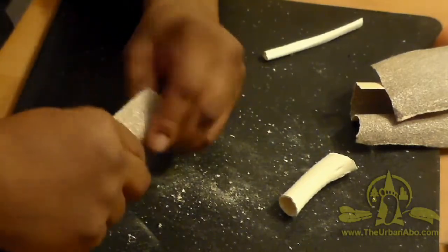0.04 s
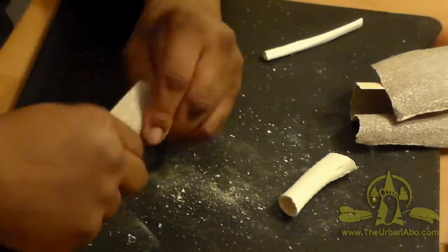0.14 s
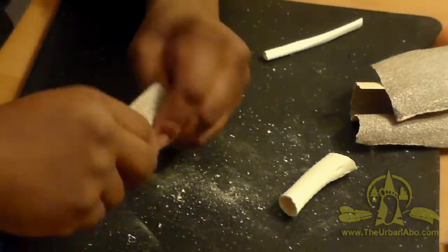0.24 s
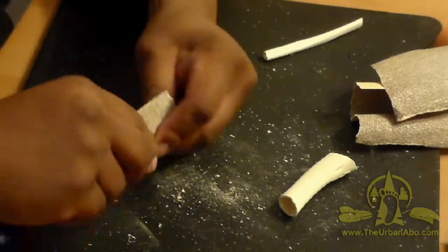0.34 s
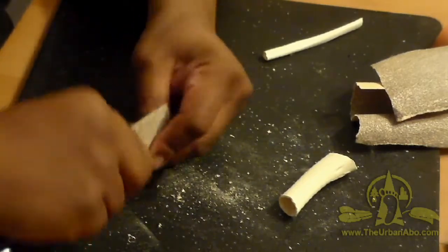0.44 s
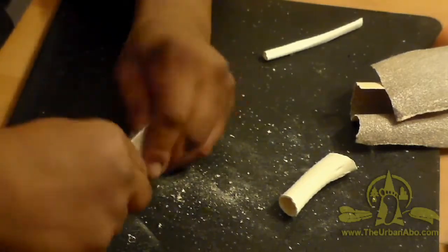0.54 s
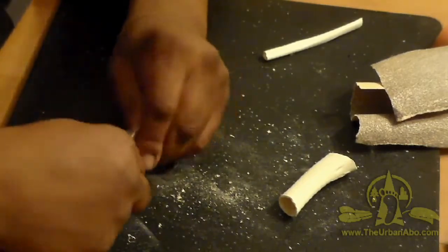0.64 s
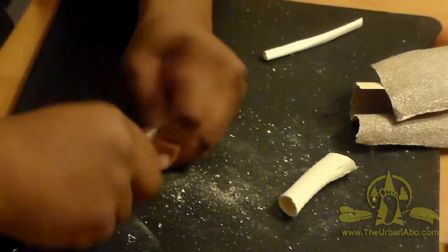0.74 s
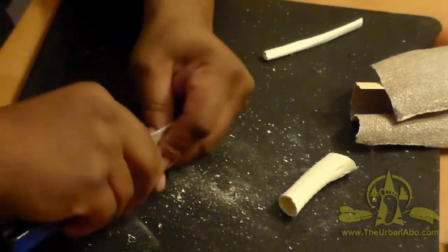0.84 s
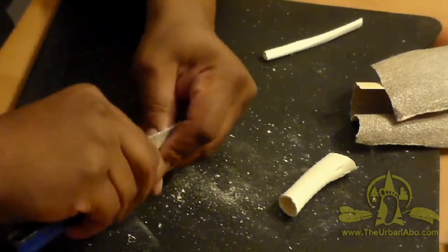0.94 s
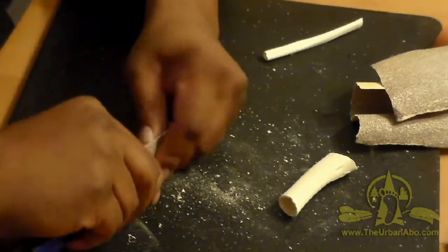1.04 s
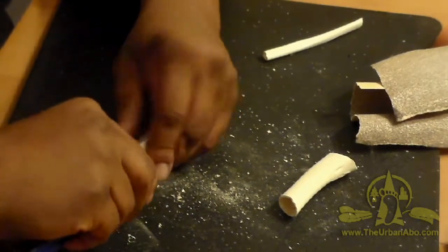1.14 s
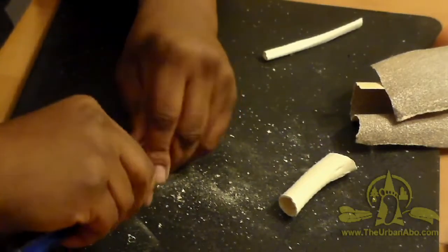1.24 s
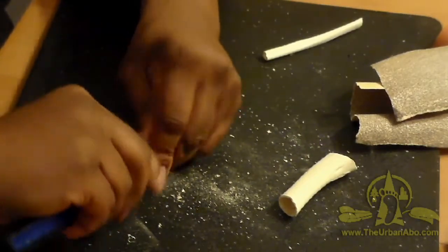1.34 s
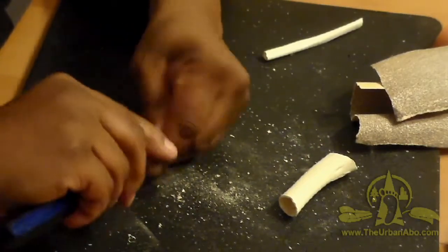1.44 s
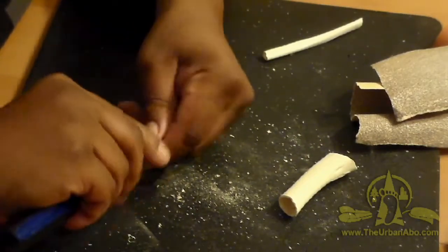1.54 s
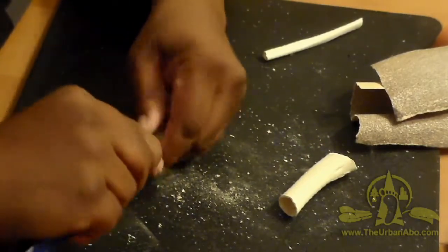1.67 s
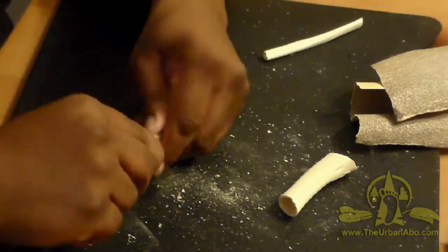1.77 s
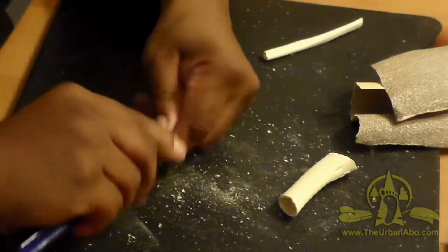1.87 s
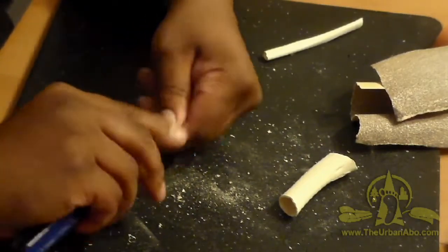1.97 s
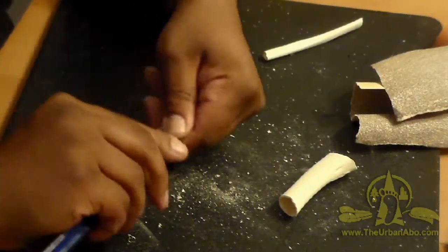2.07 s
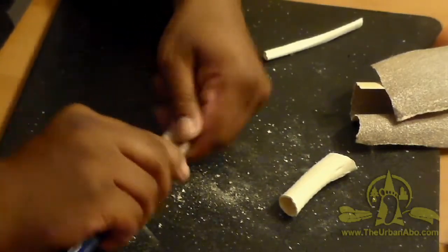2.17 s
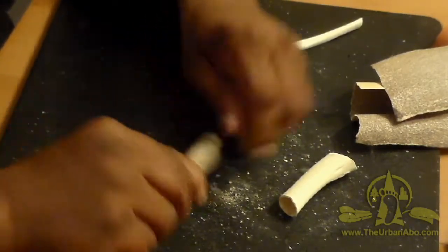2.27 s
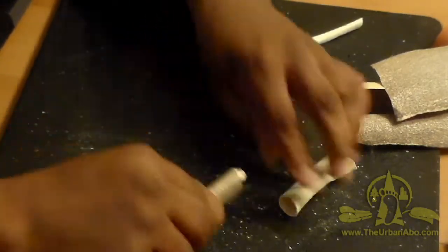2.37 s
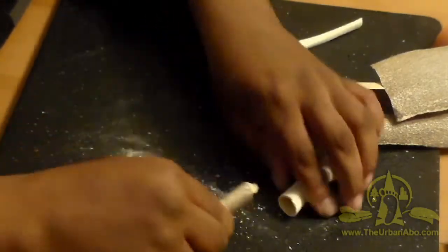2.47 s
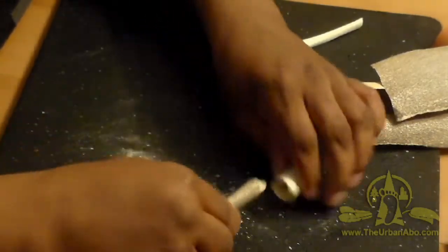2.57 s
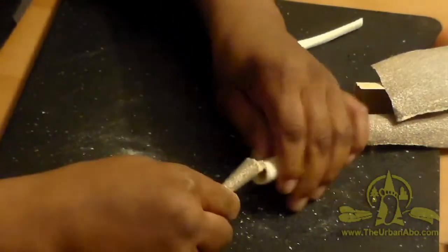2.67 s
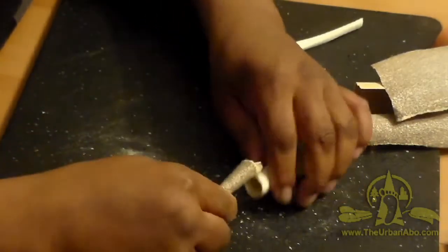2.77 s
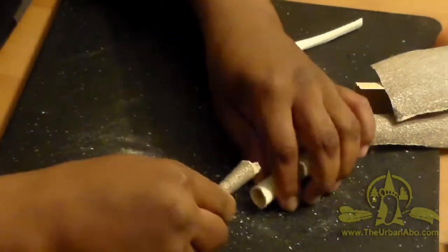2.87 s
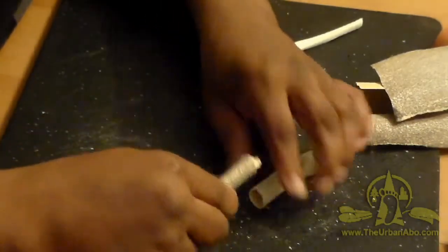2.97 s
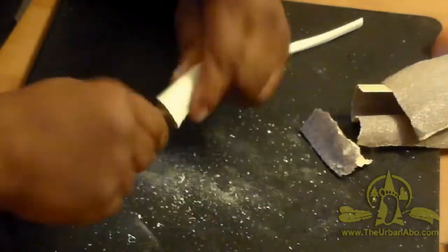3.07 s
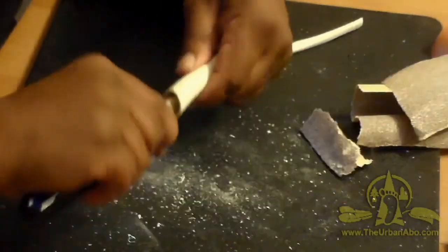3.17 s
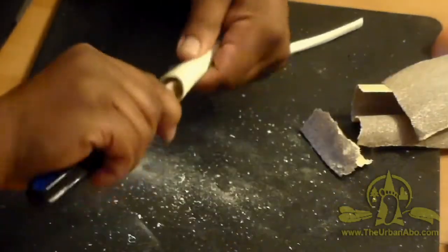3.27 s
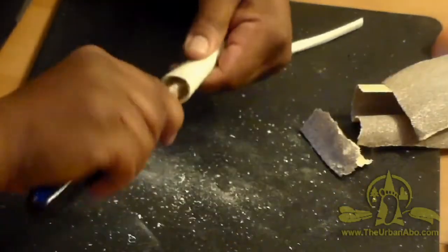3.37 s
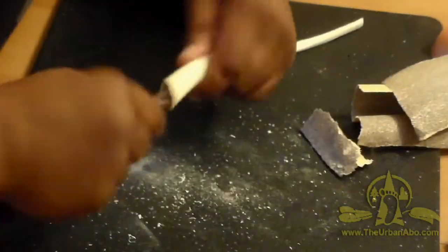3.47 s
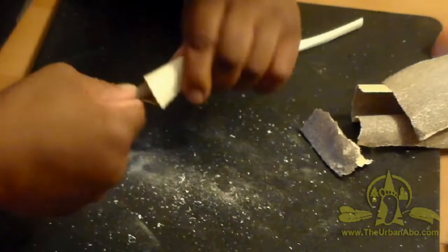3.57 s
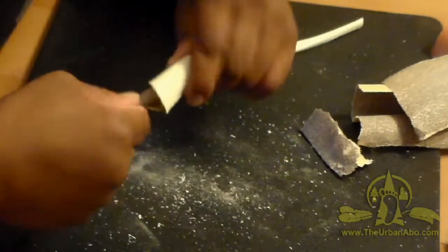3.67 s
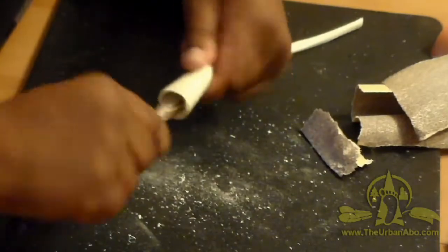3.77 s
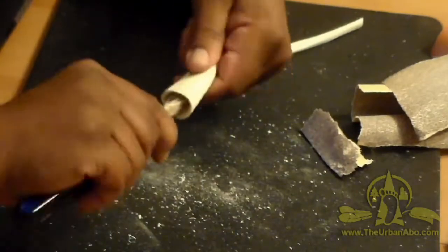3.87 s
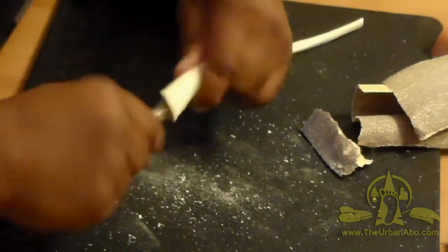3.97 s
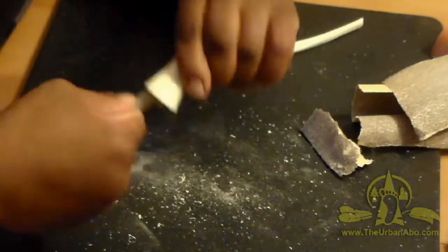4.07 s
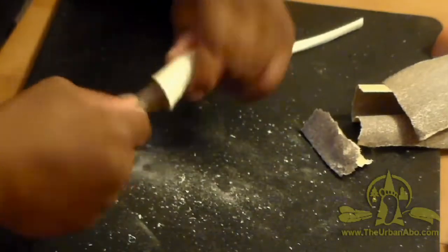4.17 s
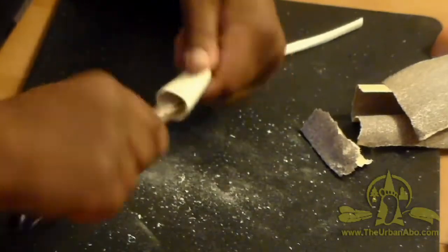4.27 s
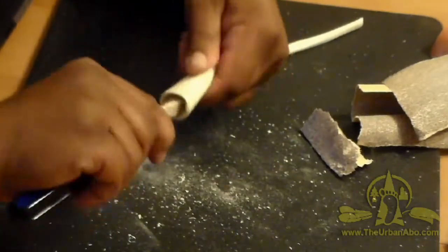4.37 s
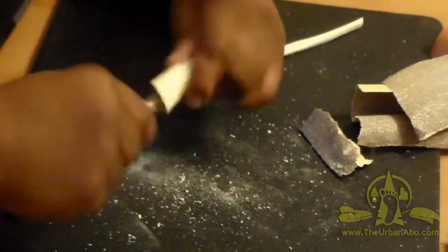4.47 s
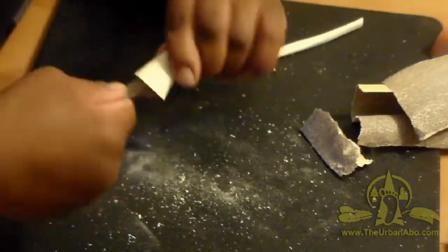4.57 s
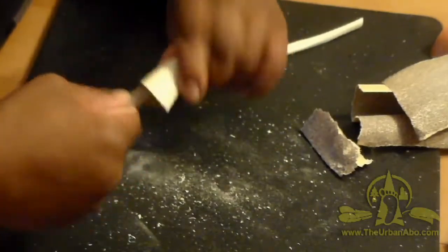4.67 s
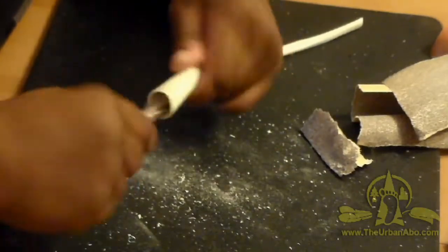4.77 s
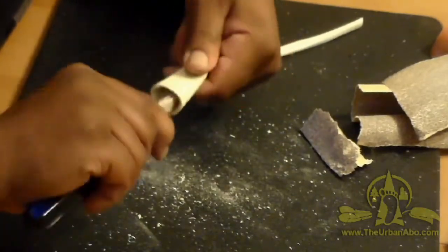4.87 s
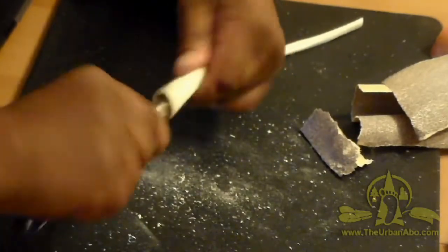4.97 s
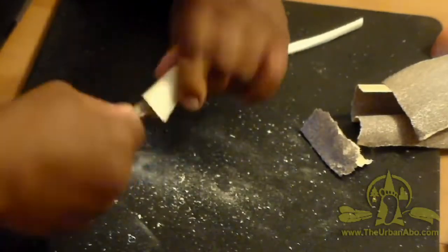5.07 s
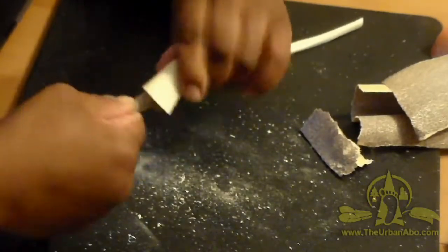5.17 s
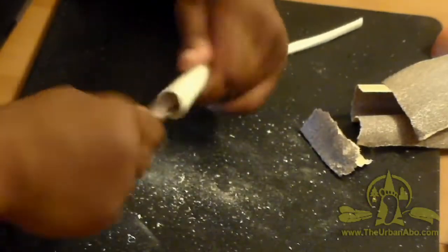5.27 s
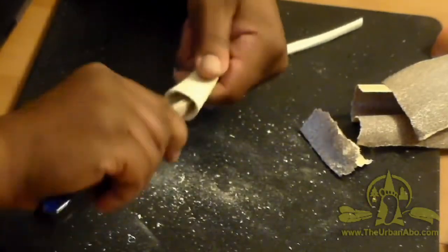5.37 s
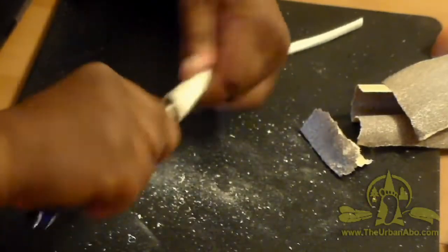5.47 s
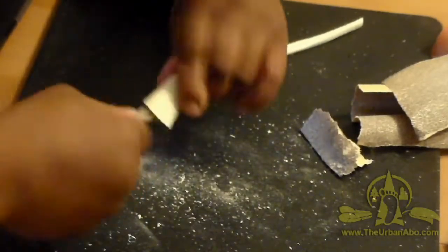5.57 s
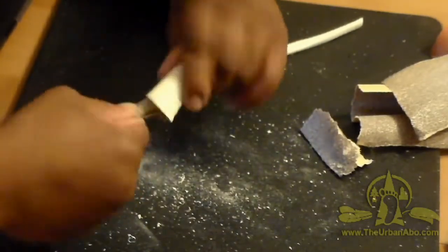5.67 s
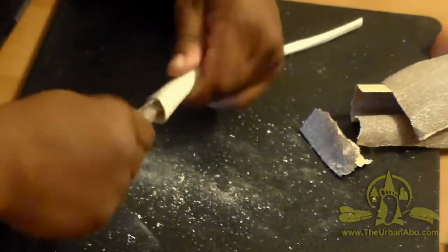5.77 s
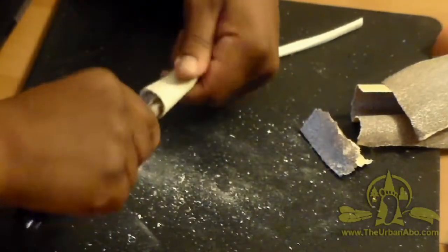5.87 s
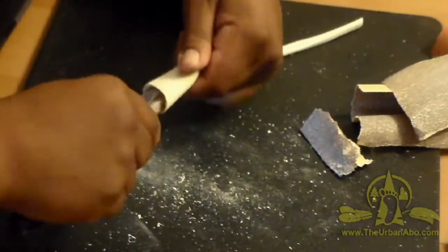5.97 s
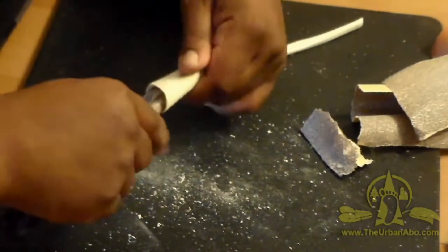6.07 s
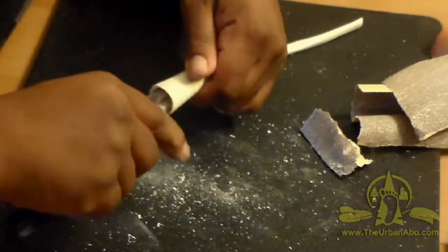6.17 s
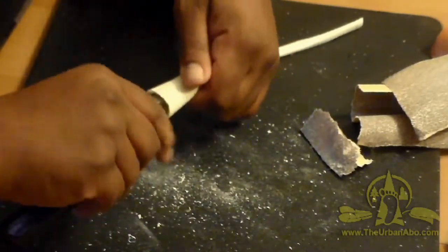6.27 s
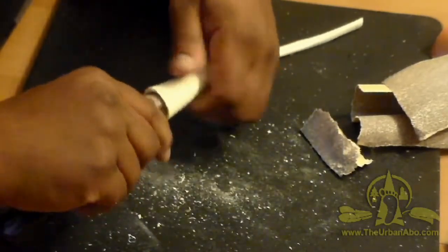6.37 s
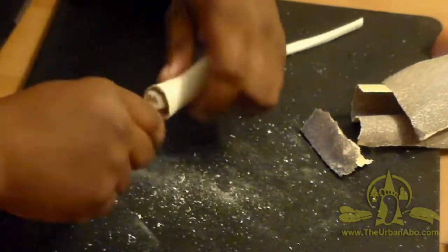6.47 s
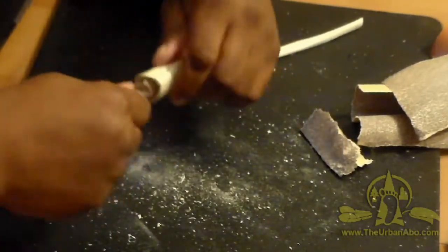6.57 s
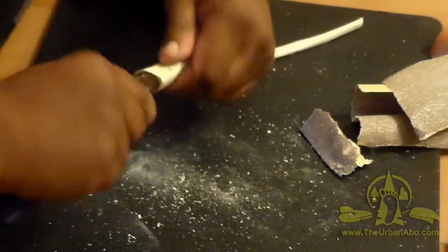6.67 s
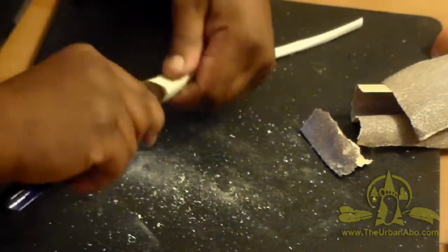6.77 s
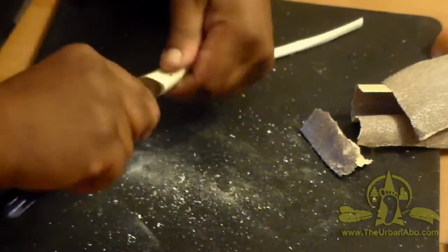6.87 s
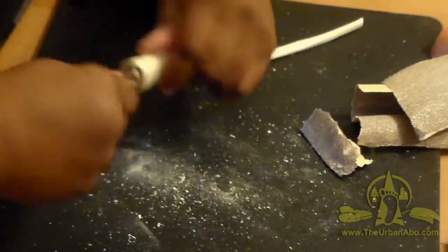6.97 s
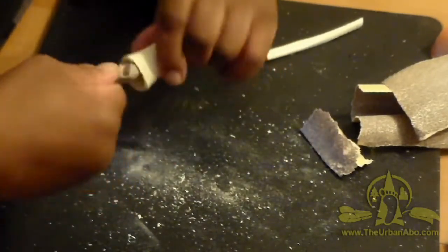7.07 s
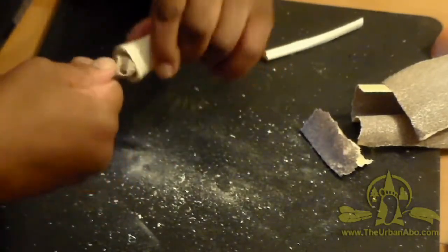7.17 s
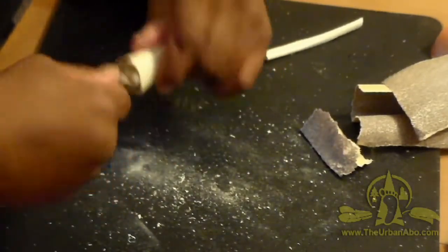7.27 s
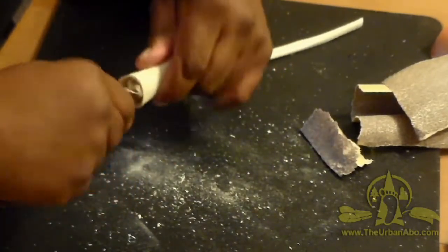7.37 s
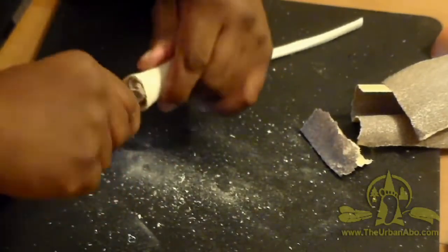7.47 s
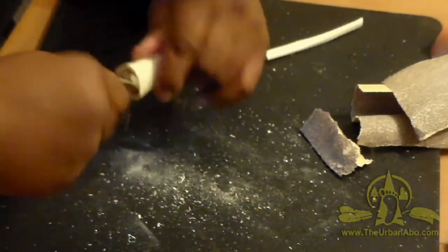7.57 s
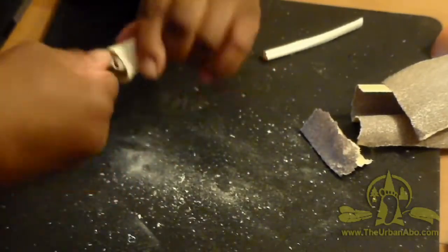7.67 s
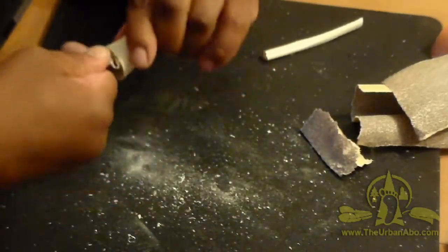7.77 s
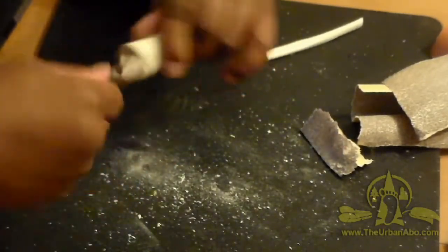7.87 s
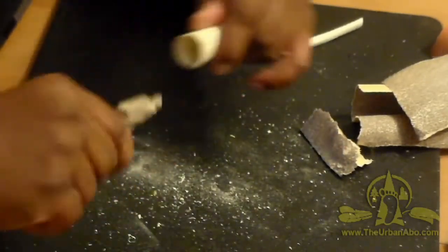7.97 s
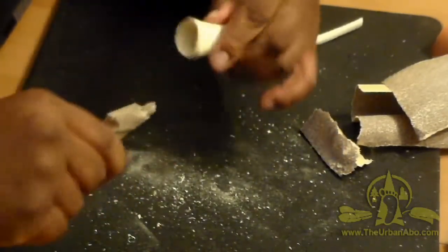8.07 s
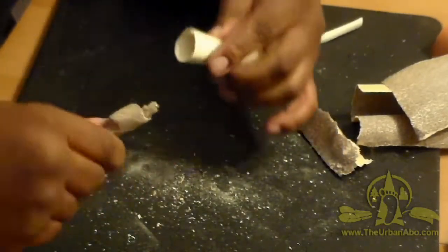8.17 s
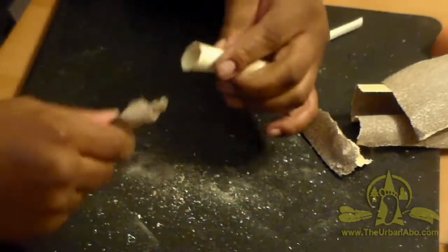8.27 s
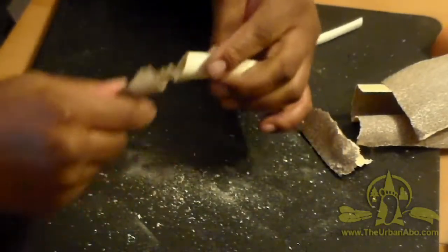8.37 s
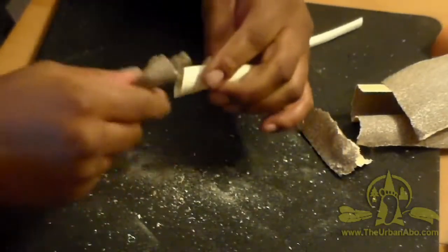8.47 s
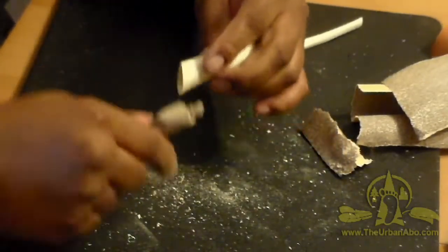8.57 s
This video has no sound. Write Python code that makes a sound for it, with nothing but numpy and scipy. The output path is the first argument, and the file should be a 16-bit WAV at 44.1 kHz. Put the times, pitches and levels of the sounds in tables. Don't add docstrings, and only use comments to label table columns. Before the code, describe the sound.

A close stereo pickup in a small reflective room, with quiet air hiss and a faint unsteady low motor hum throughout. From 0 to 2.4 s coarse sandpaper is rolled in short uneven turns: dry rasps, papery crackles and sharp grit catches, strongest in the first 0.3 s and around 1.1 to 1.3 s and 1.85 s. At 2.6 to 3.0 s a hollow bone scuffs over the mat, knocks the table several times, hardest near 2.8 s, its tube singing narrowly. Near 3.07 s there is a tiny silent gap. From 3.2 to 6.1 s much louder, quick gritty twists scrape inside the bone, about four a second, catches ringing hollow and bright, with faint low handle creaks near 3.5 and 6 s. A lull follows with faint turns, then sharp snags at 6.75 to 6.9 s and separate twists near 7.1, 7.4 and 7.8 s, ending on a bright jerk at 8.0 s and quiet room.

```python
import sys
import numpy as np
from scipy import signal
from scipy.fft import rfft, irfft, next_fast_len
from scipy.io import wavfile
from scipy.ndimage import map_coordinates

SR = 44100
rng = np.random.default_rng(int(sys.argv[2]) if len(sys.argv) > 2 else 0)


def unload_audio(sound):
    columns = np.transpose(np.atleast_2d(sound))
    steps = np.round(np.clip(columns, -1, 1) * 32767)
    wavfile.write(sys.argv[1], SR, steps.astype(np.int16))


def voltage_ratio(level):
    return 10 ** (np.asarray(level, float) / 20)


N = 381024


def along(points, hz):
    f, v = np.transpose(points)
    return np.interp(np.log(hz + 1), np.log(f + 1), v)


def wobble(knots_per_s):
    knots = rng.standard_normal(int(N * knots_per_s / SR) + 4)
    return map_coordinates(knots, [np.arange(N) * knots_per_s / SR])


def filtered(x, response):
    m = next_fast_len(x.shape[-1] + 1024)
    spectrum = rfft(x, m) * response(np.fft.rfftfreq(m, 1 / SR))
    return irfft(spectrum, m)[..., :x.shape[-1]]


def pair(noise, alike, colour):
    def weights(hz):
        turn = np.arccos(np.clip(along(alike, hz), -1, 1)) / 2
        return colour(hz) * np.array([np.cos(turn), np.sin(turn)])

    mid, side = filtered(noise, weights)
    return np.array([mid + side, mid - side])


def dying(t60):
    return voltage_ratio(-60 * np.arange(SR // 5) / SR / t60)


def blows(rows, shape):
    force = np.zeros((len(rows[0]) - 1, N))
    for s, db, *over in rows:
        force[:, round(s * SR)] = voltage_ratio(db + np.array([0, *over]))
    return signal.oaconvolve(force, shape[None], axes=1)[:, :N]


def stroked(rows, follows=0):
    attack_db_per_s, release_db_per_s = 2500, 411
    arch_db = 4
    t = np.arange(0, N, 32) / SR
    s, length, db, colour, swell = np.transpose(rows)[..., None]
    along_stroke = np.clip((t - s) / length, 0, 1) - .5
    shape = swell * along_stroke - arch_db * (2 * along_stroke) ** 2
    shape -= attack_db_per_s * np.maximum(s - t, 0)
    shape -= release_db_per_s * np.maximum(t - s - length, 0)
    gain = np.linalg.norm(voltage_ratio(db + follows * colour + shape), axis=0)
    return np.interp(np.arange(N) / SR, t, gain)


def grit(rate, spread_db, clump_db, smooth):
    grain_sizes = voltage_ratio(spread_db * np.minimum(rng.exponential(1, N), 2.5))
    releases = (rng.random(N) < rate / SR) * grain_sizes
    releases = np.abs(signal.oaconvolve(releases, dying(t60=0.0043))[:N])
    size = np.hypot(releases / releases.std(), smooth) * voltage_ratio(clump_db * wobble(40))
    return size / np.sqrt(np.mean(size ** 2))


def ringing(level, catches, grains, modes, roam_db):
    busy = np.flatnonzero(level > voltage_ratio(-120))
    span = slice(busy[0], min(busy[-1] + 4096, N))
    count = span.stop - span.start
    total = np.sqrt(sum(voltage_ratio(db) ** 2 * w for hz, w, db in modes))
    out = np.zeros(N)
    for hz, w, db in modes:
        knots = rng.standard_normal(N // 1000 + 2)
        roam = voltage_ratio(roam_db * np.interp(np.arange(count) / 1000, np.arange(len(knots)), knots))
        force = roam * np.hypot(level * grains, catches)[span] * rng.standard_normal(count)
        out[span] += voltage_ratio(db) * signal.lfilter(*signal.iirpeak(hz, hz / w, SR), force)
    small = signal.butter(2, 0.86 * modes[0][0], "high", fs=SR)
    return signal.lfilter(*small, out) * np.sqrt(SR / np.pi) / total


# (frequency [Hz], density [dB per Hz])
AIR_SPECTRUM = [(8.8, -52), (15, 0.5), (57, -7.5), (248, -20), (787, -26.5), (10000, -33), (13800, -33.5),
                (15000, -48.5)]
# (frequency [Hz], likeness [0..1])
AIR_LIKENESS = [(30, 0.813), (130, 0.7), (300, 0.44), (700, 0.23), (5000, 0.062)]


def background():
    shaft_hz, shaft_db, second_db, air_db = 29.9, -55, -62.5, -54.5
    turns = 2 * np.pi * np.cumsum(shaft_hz * (1 + 0.011 * wobble(2.915))) / SR
    hum = voltage_ratio(shaft_db + 4.0 * wobble(2.98)) * np.sin(turns)
    second_level = voltage_ratio(second_db + 4.4 * np.tanh(wobble(7)))
    hum += second_level * np.sin(2 * turns + 0.62 * wobble(19))
    air = pair(rng.standard_normal((2, N)), AIR_LIKENESS, lambda hz: voltage_ratio(along(AIR_SPECTRUM, hz)))
    return hum + voltage_ratio(air_db) * air / air.std()


# (frequency [Hz], width [Hz], level [dB])
FIZZ_MODES = [(9130, 2900, 7), (10300, 900, -12), (11900, 3100, 0.5)]
# (frequency [Hz], width [Hz], level [dB])
HAND_MODES = [(406, 285, -3.5), (583, 190, -3.5), (1126, 600, -3.5)]


def rasp(strokes, catches, body, slip_db, fizz_db):
    stroke_db, catch_db, grip_db = -4, -7.5, -17
    shares = (0, 1, .5, -.6)
    low, high, fizz, grip = (voltage_ratio(stroke_db) * stroked(strokes, share) for share in shares)
    catch_and_slip = dying(t60=0.01) + voltage_ratio(slip_db) * dying(t60=0.22)
    jolt, bright_jolt = voltage_ratio(catch_db) * np.abs(blows(catches, catch_and_slip))
    grains = grit(rate=400, spread_db=0.5, clump_db=1.5, smooth=0.75)
    sound = ringing(low, jolt, grains, body[0], roam_db=2)
    sound += ringing(high, voltage_ratio(0.5) * bright_jolt, grains, body[1], roam_db=2)
    sound += ringing(voltage_ratio(fizz_db) * fizz, voltage_ratio(fizz_db + 3.5) * bright_jolt, grains, FIZZ_MODES, roam_db=1)
    return sound + ringing(voltage_ratio(grip_db) * grip, voltage_ratio(-19.5) * jolt, grains, HAND_MODES, roam_db=0.5)


# (start [s], length [s], level [dB], brightness [dB], swell [dB])
ROLLING_STROKES = [(-.06, 0.29, -46.5, -5, -9), (.235, 0.1, -45, 4, 3), (.475, 0.28, -55, 0, -12),
                   (.8, 0.56, -55, 2.5, 5), (1.06, 0.1, -49, 8.5, -13.5), (1.15, .11, -41.5, -0.5, -12.5),
                   (1.3, 0.29, -49.5, 1, -3.5), (1.69, 0.15, -45.5, 1.5, -15.5),
                   (1.85, 0.028, -40.5, -9, -8), (1.89, 0.09, -57.5, -0.5, 0),
                   (2.0, 0.18, -55.5, -11.5, -23), (2.245, 0.083, -55, 4.5, -5),
                   (2.32, 0.056, -40.5, -10, -1)]
# (time [s], peak [dB], brightness [dB])
PAPER_CRACKLES = [(0.055, -37, -12), (0.131, -28, -6), (0.2092, -28, -13), (0.2403, -20, 5),
                  (0.2896, -25, 3), (0.4791, -42, 2), (0.4988, -39.5, 6.5), (0.5545, -33.5, -10),
                  (0.5911, -36.5, -12), (0.8018, -37, 8.5), (0.858, -34, -11), (0.8975, -27.5, -5),
                  (0.9786, -49, 10), (1.067, -22.5, -9.5), (1.1023, -29.5, -2), (1.1667, -19, -12),
                  (1.244, -38, 9), (1.3216, -20.5, -8.5), (1.3979, -35, 9.5), (1.4217, -34.5, 8),
                  (1.5862, -36, -3.5), (1.695, -27.5, 0), (1.8452, -21.5, -6), (1.8919, -34, -8),
                  (2.0083, -44, 5), (2.1976, -41, -0.5), (2.2518, -27.5, -2), (2.2912, -37, 3),
                  (2.347, -29, -3)]
# (frequency [Hz], width [Hz], level [dB])
PAPER_MODES = [
    [(1716, 870, -6.5), (2330, 480, 2), (2550, 170, -6), (2850, 430, -14)],
    [(3450, 300, 1), (4150, 320, 0.5), (5160, 1000, -2), (6740, 940, 1)],
]


def rolling():
    return rasp(ROLLING_STROKES, PAPER_CRACKLES, PAPER_MODES, slip_db=-20.5, fizz_db=-3)


# (delay [s], level [dB])
STRONGEST_ECHO = (.0053, -5)
# (delay [s], level [dB])
WALL_ECHOES = [(.0027, -21.5), (.0061, -9), (.015, -12), (.026, -16.5)]
# (frequency [Hz], likeness [0..1])
ROOM_LIKENESS = [(300, 0.92), (1500, .95), (3000, 0.85), (6000, 0.072), (14000, 0.029)]


def close_paths(lag):
    smear = np.exp(-np.arange(24) / 5)
    paths = np.zeros((2, 2048))
    for s, db in [STRONGEST_ECHO, *WALL_ECHOES]:
        echo = rng.standard_normal((2, 24)) * smear
        start = round(s * SR + rng.normal(0, 6))
        paths[:, start:start + 24] += voltage_ratio(db) * echo / np.linalg.norm(echo[0])
    paths = pair(paths, ROOM_LIKENESS, np.ones_like)
    ports = np.array([[-.5], [.5]]) * lag * rng.standard_normal()
    port_gain = voltage_ratio(np.array([[-.4], [.4]]))
    paths[:, :17] += np.sinc(np.arange(17) - 8 - ports) * np.hanning(17) * port_gain
    return paths


# (frequency [Hz], t60 [s])
ROOM_T60 = [(200, 0.11), (2000, 0.34), (6000, 0.37), (14000, 0.38)]


def room(x, tail_db, lag):
    hz, t, z = signal.stft(rng.standard_normal((2, SR // 2)), SR, nperseg=256)
    decay = voltage_ratio(-60 * t / along(ROOM_T60, hz)[:, None])
    tail = signal.istft(z * decay, SR, nperseg=256)[1]
    onset = np.clip(np.arange(tail.shape[1]) / (SR * 0.0063), 0, 1)
    tail = pair(tail, ROOM_LIKENESS, np.ones_like) * onset
    tail *= voltage_ratio(tail_db) / np.linalg.norm(tail[0])
    out = signal.oaconvolve(x[None], tail, axes=1)[:, :N + 8192]
    hop = 2048
    for start in range(0, N, hop):
        piece = x[start:start + 2 * hop]
        piece = piece * np.hanning(2 * hop + 1)[:len(piece)]
        answer = signal.fftconvolve(piece[None], close_paths(lag), axes=1)
        out[:, start:start + answer.shape[1]] += answer
    return out[:, :N]


def ducked(quiet, loud):
    threshold_db, excess_share, memory_s = -38, .2, 0.31
    keep = np.exp(-1 / (memory_s * SR))
    power = signal.lfilter([1 - keep], [1, -keep], loud[0] ** 2)
    return quiet * (1 + power / voltage_ratio(2 * threshold_db)) ** (-excess_share / 2)


# (start [s], length [s], table level [dB], tube ring over it [dB], swell [dB])
MAT_SCUFFS = [
    (.085, 0.089, -54, -17, 0),
    (2.585, 0.1, -56.5, -10, 3),
    (2.68, .36, -68.5, 16.5, 1),
    (2.75, 0.023, -45, -3, -4),
    (2.787, 0.032, -45.5, -14, -5),
    (2.935, 0.085, -43.5, -16, -14),
]
# (time [s], peak [dB], tube ring over peak [dB])
TABLE_KNOCKS = [
    (2.584, -44, 8),
    (2.632, -33.5, -7),
    (2.749, -28.5, -8.5),
    (2.787, -21, -24),
    (2.934, -30, -7),
    (2.969, -34, -18),
]
# (frequency [Hz], width [Hz], level [dB])
TABLE_MODES = [(139, 32, 0), (234, 74, 1), (422, 180, -0.5), (800, 260, -3.5), (1320, 260, -7),
               (3250, 490, -18.5)]
# (frequency [Hz], width [Hz], level [dB])
TUBE_MODES = [(1766, 45, 8.5), (4350, 60, -7.5)]


def pickup():
    scuff = grit(rate=300, spread_db=-0.5, clump_db=0.8, smooth=1.0)
    knock_shape = dying(t60=0.02) + voltage_ratio(-24) * dying(t60=0.1)
    knock, tap = np.abs(blows(TABLE_KNOCKS, knock_shape))
    table = ringing(voltage_ratio(-4) * stroked(MAT_SCUFFS), voltage_ratio(-9) * knock, scuff, TABLE_MODES, roam_db=3.0)
    tube = ringing(voltage_ratio(-3) * stroked(MAT_SCUFFS, 1), voltage_ratio(-6.0) * tap, scuff, TUBE_MODES, roam_db=0.0)
    return table + tube


# (start [s], length [s], level [dB], brightness [dB], swell [dB])
REAMING_STROKES = [(3.2, 0.033, -40, 4, 2), (3.25, 0.075, -32, 1, -5), (3.4, 0.095, -47, -4, 0),
                   (3.55, 0.081, -46, 0.5, 0), (3.61, 0.19, -41, -1, -17.5), (3.81, 0.14, -31, 1, 1.5),
                   (4.055, 0.072, -37.5, 0, 4), (4.16, 0.082, -32, -2, -12.5), (4.275, 0.098, -32, -2, -11),
                   (4.345, 0.12, -32, 0.5, -18.5), (4.53, 0.032, -40.5, -2, -12),
                   (4.58, .13, -31, -1, -10.5), (4.83, 0.094, -31.5, 1.5, 6.5),
                   (4.95, 0.037, -37.5, 3.5, 0), (5.1, 0.066, -41.5, -2, -5), (5.15, 0.09, -32.5, -3, 2),
                   (5.34, .12, -31.5, -2.5, 3), (5.61, 0.04, -38, -3, -2.5), (5.66, 0.074, -33, 0.5, -3),
                   (5.83, 0.12, -37.5, 0, -3), (5.975, 0.055, -31.5, -3.5, 8.5), (6.08, 0.11, -55, -1, 0)]
# (time [s], peak [dB], brightness [dB])
BONE_CATCHES = [(3.2081, -27, -8), (3.256, -12, -5.5), (3.4035, -14, -4), (3.6294, -13, -8.5),
                (3.694, -30, 9), (3.7495, -22, 2.5), (3.8267, -30, -0.5), (3.881, -11, -8),
                (3.9272, -12, -14), (4.06, -15.5, -14), (4.096, -11.5, -3), (4.13, -13.5, -5),
                (4.3025, -12, -3), (4.348, -9, -3.5), (4.4371, -15.5, -6.5), (4.5351, -20.5, -9),
                (4.581, -11.5, -15), (4.6172, -24, -6), (4.6649, -21, 10), (4.8494, -17.5, -3),
                (4.8891, -15, -2), (4.9577, -16, -0.5), (5.031, -34, 8), (5.158, -20, -14),
                (5.2322, -23, 7), (5.3608, -23, 3), (5.3943, -11.5, -2), (5.4212, -10.5, -3.5),
                (5.665, -12.5, -5.5), (5.7383, -23.5, 4)]
# (time [s], peak [dB], brightness [dB])
BINDING_SNAGS = [(5.8518, -25, 5.5), (5.895, -24, 4), (5.9205, -19.5, 4.5), (5.9803, -26.5, 9),
                 (5.9987, -13.5, -3.5), (6.119, -34.5, 6.5), (6.1557, -30, -2.5), (6.3834, -26, -13),
                 (6.5139, -29.5, 4.5), (6.7346, -27, 3.5), (6.7437, -17, -8), (6.7636, -32, 6),
                 (6.7876, -9.5, -2), (6.8203, -19, 1.5), (6.862, -8.5, -7), (7.0913, -23.5, -4.5),
                 (7.3323, -25, 1), (7.4024, -28, -14), (7.435, -24.5, -9), (7.456, -14.5, -4.5),
                 (7.4942, -14.5, 5.5), (7.7293, -32.5, 3.5), (7.7462, -20.5, -15), (7.7835, -15, -3.5),
                 (7.8299, -19.5, -3), (7.8426, -18.5, 0.5), (7.9788, -21, -12), (8.0081, -19, 4)]
# (frequency [Hz], width [Hz], level [dB])
BONE_MODES = [
    [(1497, 254, -8), (1681, 207, 0.5), (1860, 110, 3), (2147, 88, -5.5), (2565, 133, -7.5),
     (2647, 300, -1), (3024, 610, -10.5)],
    [(3507, 140, 4), (4134, 380, 0.5), (5270, 930, -5), (6400, 450, -7.5), (6780, 1040, -4.5)],
]


def reaming():
    catches = BONE_CATCHES + BINDING_SNAGS[:7]
    return rasp(REAMING_STROKES, catches, BONE_MODES, slip_db=-20.0, fizz_db=-8)


# (start [s], length [s], level [dB], brightness [dB], swell [dB])
HANDLE_SQUEEZES = [
    (3.47, 0.36, -64, 0, -2.5),
    (5.86, 0.065, -58.5, 0, 9),
    (6.05, 0.31, -63, 0, -14),
]
# (frequency [Hz], width [Hz], level [dB])
HANDLE_MODES = [(300, 40, -24), (350, 58, 0)]


def creak():
    slips = grit(rate=260, spread_db=5, clump_db=-2.5, smooth=0.72)
    return ringing(stroked(HANDLE_SQUEEZES), 0, slips, HANDLE_MODES, roam_db=3.5)


# (start [s], length [s], level [dB], brightness [dB], swell [dB])
JERKING_STROKES = [
    (6.38, 0.21, -52.5, -3, -10),
    (6.62, 0.049, -51, 1, 6),
    (6.734, 0.064, -38.5, 1, 0),
    (7.085, .19, -38, -3, -1.5),
    (7.31, 0.11, -36.5, -2.5, -0.5),
    (7.45, 0.077, -44, 4.5, 23),
    (7.73, .17, -38.5, -2, -1),
    (7.96, 0.036, -39, 4, 18),
    (8.005, 0.056, -30.5, 4, -8.5),
]
# (frequency [Hz], width [Hz], level [dB])
DEEP_BONE_MODES = [
    [(1536, 170, -3), (1774, 144, 3), (2070, 120, -4.5), (2540, 167, 1), (2850, 196, -1)],
    [(3410, 260, 6), (4190, 420, -2), (5380, 800, -5), (6780, 980, -4.5)],
]


def jerking():
    return rasp(JERKING_STROKES, BINDING_SNAGS[7:], DEEP_BONE_MODES, slip_db=-20.5, fizz_db=-9.0)


def scene():
    work = rolling() + pickup() + reaming() + creak() + jerking()
    heard = room(work, tail_db=-6.5, lag=0.74)
    return heard + ducked(background(), heard)


def low_pass(x):
    return signal.sosfilt(signal.butter(12, 15480, fs=SR, output="sos"), x)


# (start [s], end [s])
GAP = (3.0648, 3.1042)


def record(dry):
    top_hz, leak_db = 14250, -43.0
    limited = filtered(dry, lambda hz: 1 / (1 + (hz / top_hz) ** 90) + voltage_ratio(leak_db))
    t = np.arange(N) / SR
    remnant = voltage_ratio(-22 - 3000 * np.clip(t - GAP[0], 0, 1))
    gate = np.where((t > GAP[0]) & (t < GAP[1]), remnant, 1)
    return low_pass(gate * limited)


dry = scene()
out = record(dry)
unload_audio(out)
```